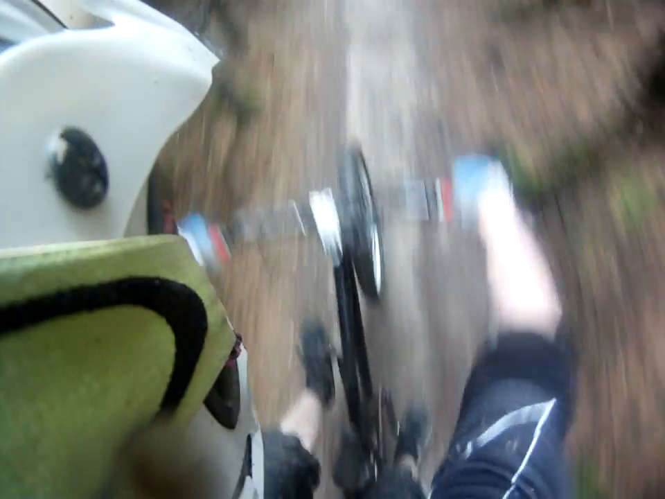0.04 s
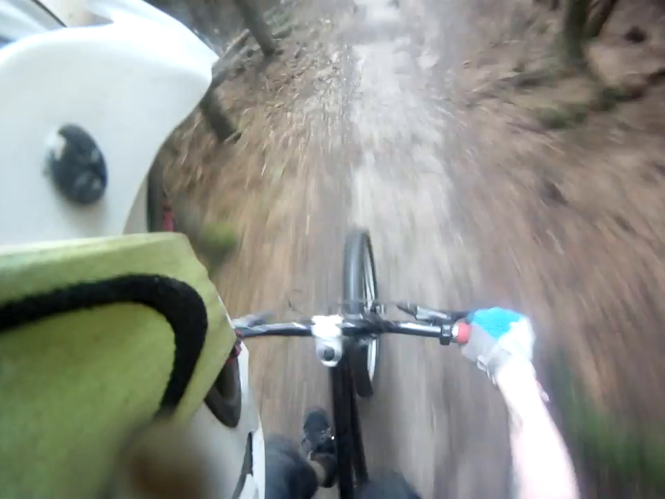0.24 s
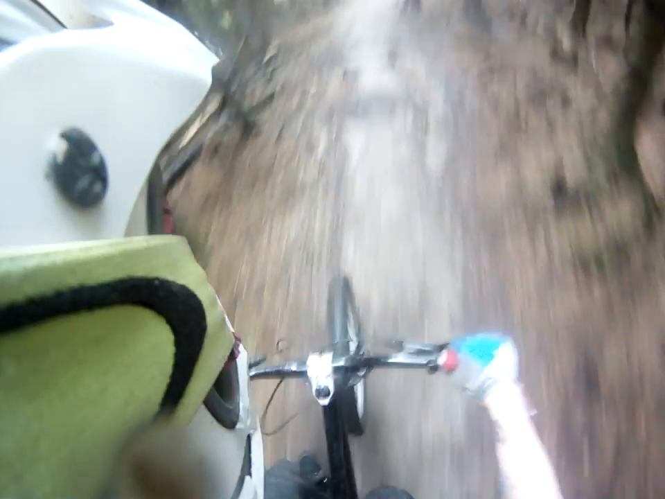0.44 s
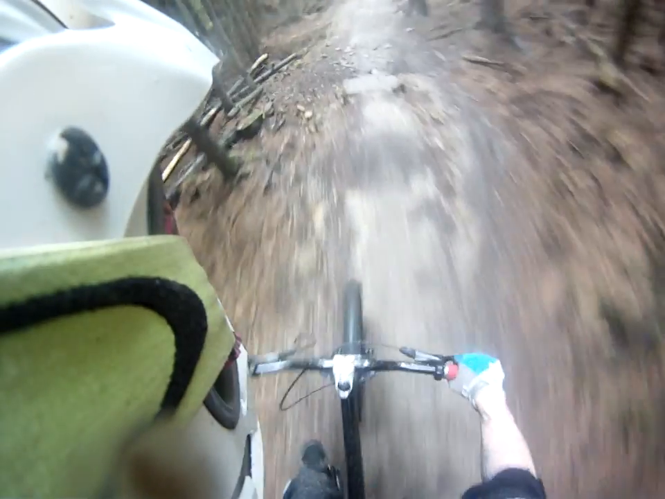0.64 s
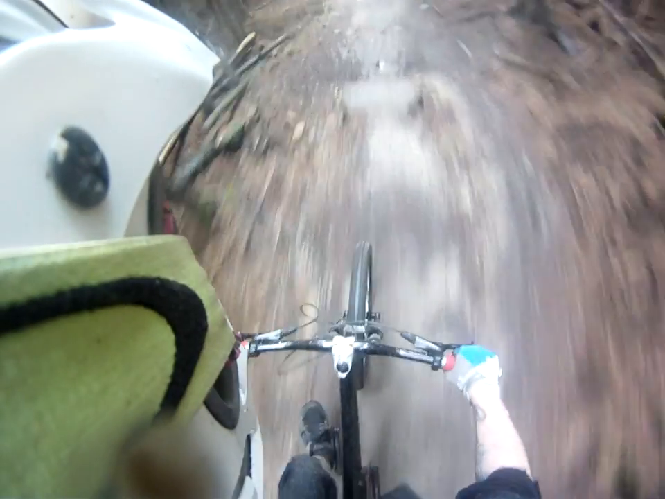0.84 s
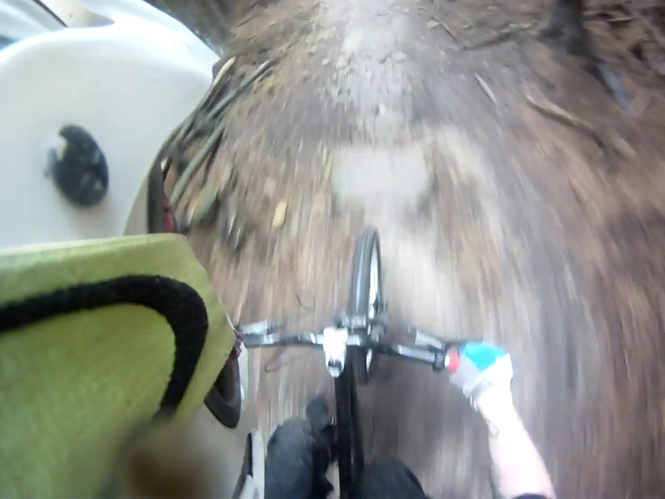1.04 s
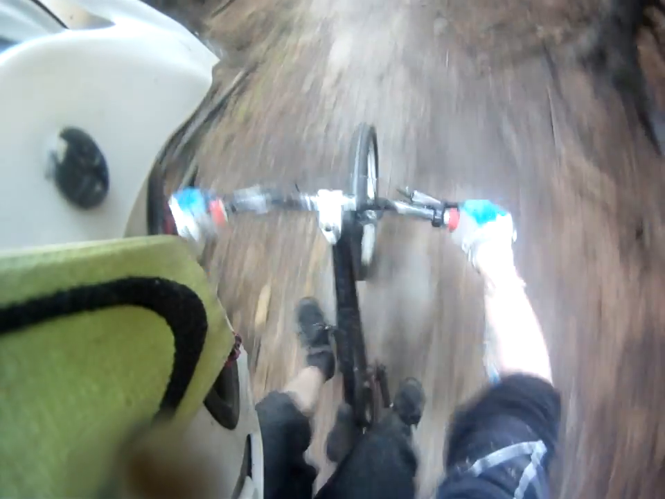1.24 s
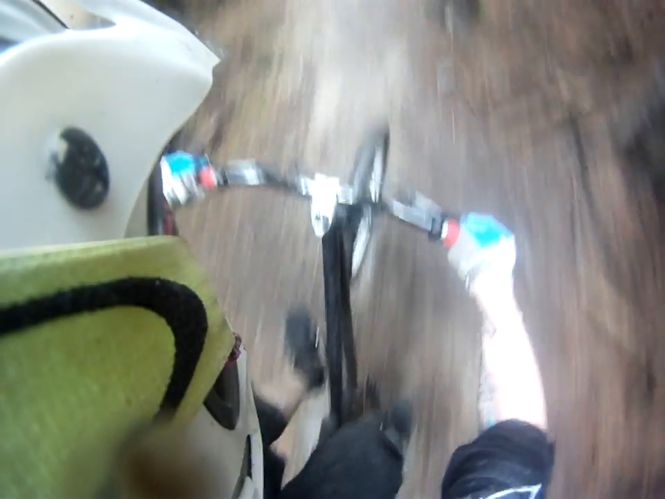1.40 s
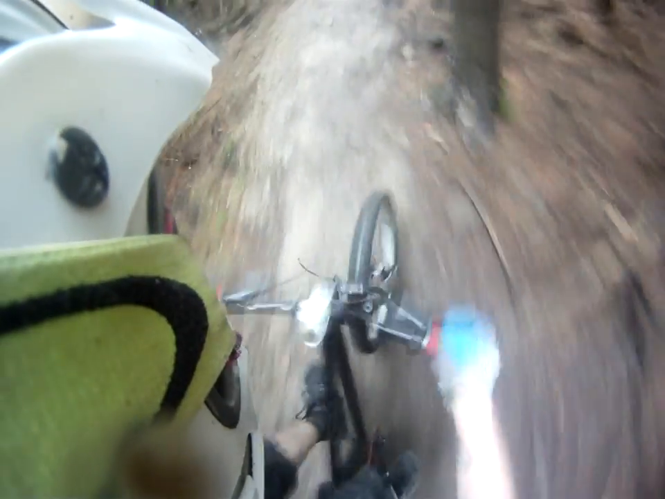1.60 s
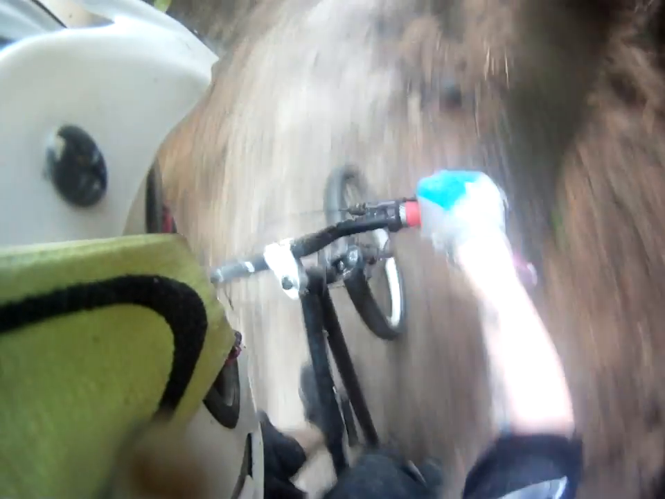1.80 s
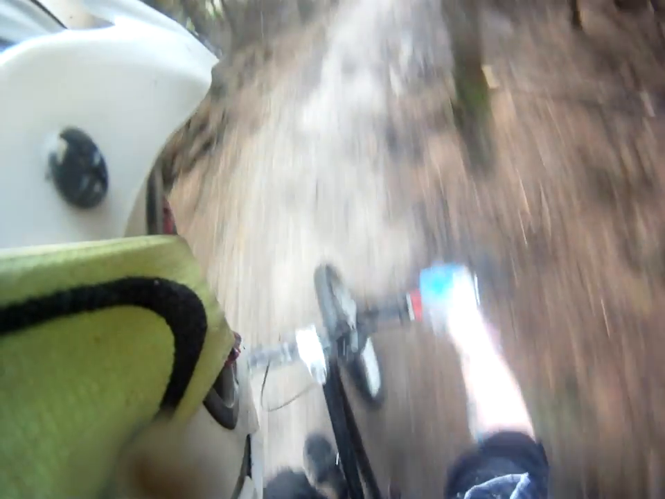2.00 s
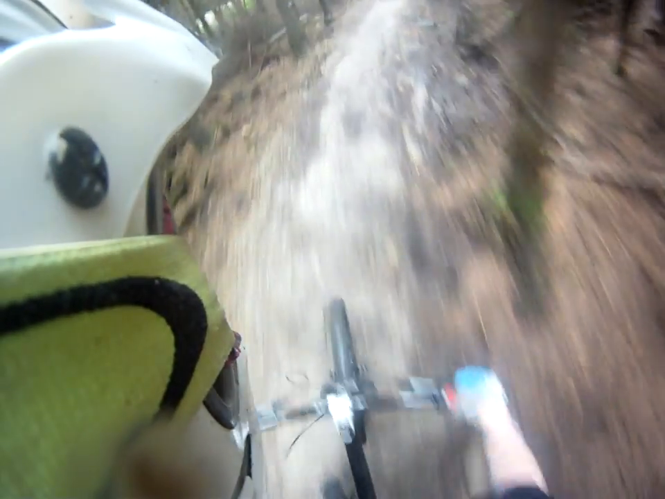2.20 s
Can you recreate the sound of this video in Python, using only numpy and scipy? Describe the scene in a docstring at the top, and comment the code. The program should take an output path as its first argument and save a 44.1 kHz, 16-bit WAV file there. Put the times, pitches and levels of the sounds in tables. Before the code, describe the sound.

A mountain bike knocks over bumps on a dirt trail, with tyre crunch and wind rumble.

```python
"""Mountain bike on a forest trail

On a dirt descent, from a cased camera on the rider's helmet: two microphones, about head height above
the tyres. Wind and ground rumble underneath. Below, tyres crunch over grit and scrub once, stones ping,
the chain jangles and small bumps knock the frame. Right at the microphones, two hard bumps make the
mount clack and the helmet boom. The camera holds coarse samples, mirroring it all into a glassy treble."""
import sys
import numpy as np
from scipy import signal
from scipy.fft import rfft, irfft
from scipy.io import wavfile
from scipy.ndimage import uniform_filter1d

SR = 44100
rng = np.random.default_rng(int(sys.argv[2]) if len(sys.argv) > 2 else 0)


def wav_out(sig):
    """Save sig, one row per channel (or a flat mono array), as 16-bit PCM at SR to the path in sys.argv[1]."""
    wavfile.write(sys.argv[1], SR, np.round(np.clip(np.atleast_2d(sig).T, -1, 1) * 32767).astype(np.int16))


N = 103635
T = np.arange(N) / SR

# rumble of wind and ground, before its ceiling and gain: (time [s], level [dB])
RUMBLE_LEVEL = [(0.0, -49.5), (0.03, -32.5), (0.13, -40), (0.22, -22.5), (0.25, -32), (0.3, -36.5),
                (0.38, -30), (0.42, -24.5), (0.52, -44), (0.69, -41.5), (0.8, -37), (0.84, -45),
                (0.99, -39.5), (1.05, -49), (1.28, -37), (1.33, -27), (1.39, -37), (1.66, -39),
                (1.79, -12.5), (1.83, -29.5), (1.94, -30), (1.98, -43), (2.14, -38), (2.18, -50.5),
                (2.35, -35.5)]
RUMBLE_CEILING_DB, RUMBLE_GAIN_DB = -21.5, 0.5
# that rumble, before a further roll-off: (frequency [Hz], level [dB])
RUMBLE_COLOUR = [(25, 0), (38, 3), (52, -8.5), (70, -16), (88, -15), (115, -39), (170, -40.5), (300, -53.5),
                 (600, -73.5)]
# steady rush of air past the helmet: (frequency [Hz], level [dB])
AIR_COLOUR = [(60, 5.5), (200, 7.5), (350, 2.5), (800, -2.5), (1200, 3), (2000, -25.5), (4500, -13.5)]
# each microphone's own hiss: (frequency [Hz], level [dB])
HISS_COLOUR = [(300, 2.5), (1000, -1), (3000, -6), (4700, 4.5), (5500, -4.5)]
AIR_DB, HISS_DB = -61.5, -75
# air slaps the microphone ports: (time [s], level [dB], t60 [s])
PUFFS = [(0.291, -25, 0.065), (1.777, -39, 0.12)]
# those puffs: (frequency [Hz], level [dB])
PUFF_COLOUR = [(30, -3), (150, 9), (250, -8), (500, -31.5), (1500, -22.5), (5500, -36)]
# the ports crackle on the first hard bump and its rebound: (time [s], level [dB])
CRACKLES = [(0.2865, -24.5), (0.2985, -36.5)]
# those crackles: (frequency [Hz], level [dB])
CRACKLE_COLOUR = [(1000, -6), (2000, 5), (3000, 0), (3800, -3), (5500, -6)]

# a faint ringing scrape, probably a brake disc: (time [s], level [dB])
DISC_LEVEL = [(1.84, -87), (1.93, -61.5), (2.17, -66), (2.3, -87)]
# its resonances: (frequency [Hz], level [dB], t60 [s])
DISC_MODES = [(1450, -0.5, .14), (1486, 0, 0.076), (2736, -10, .12)]
# the chain slaps: (time [s], level [dB])
CHAIN_SLAPS = [(1.6612, -35), (1.694, -48), (1.709, -45), (1.7374, -39)]
# modes of the chain and drive: (frequency [Hz], level [dB], t60 [s])
CHAIN_MODES = [(1216, -7, 0.086), (1552, -8.5, 0.051), (2074, -25, .03), (2732, -6.5, 0.033),
               (3286, -7.5, 0.045), (3890, -14, 0.03)]
JANGLES_PER_S, JANGLE_DB = 86, -11.5   # level relative to the rolling noise
# small stones tick against the bike: (time [s], level [dB], pitch [Hz])
STONES = [(0.668, -46.5, 2800), (0.7525, -49, 2080), (0.8028, -42, 1630), (0.805, -53.5, 3320),
          (0.889, -47, 2650), (0.929, -44, 2130), (0.942, -43, 2380), (1.0038, -44.5, 2360),
          (1.115, -45.5, 1900), (1.807, -42, 2420), (2.071, -51, 2020), (2.082, -44, 2070),
          (2.212, -47.5, 2420), (2.326, -51, 2050)]
# the click in each tick: (frequency [Hz], level [dB])
STONE_CLICK_COLOUR = [(400, -16), (1100, 17), (2200, 32), (3700, -21.5), (5500, -36)]
STONE_CLICK_DB = -9.5   # relative to the ping

# tyres rolling on the trail: (time [s], level [dB])
ROLL_LEVEL = [(0, -65), (0.19, -67), (0.25, -62), (0.35, -61), (0.47, -51), (0.5, -57), (0.58, -63.5),
              (0.78, -56.5), (0.9, -55), (1.01, -59.5), (1.11, -51), (1.2, -56), (1.32, -58.5),
              (1.39, -67.5), (1.64, -70), (1.7, -53), (1.95, -58.5), (2.17, -60.5), (2.35, -62.5)]
# tyres bite into loose grit: (time [s], level [dB], t60 [s])
CRUNCHES = [(0.211, -45.5, 0.16), (0.243, -38, 0.18), (0.437, -66, 0.044), (0.456, -50.5, 0.16),
            (0.922, -52.5, 0.56), (1.658, -40.5, 0.088), (1.698, -47.5, 0.26), (1.734, -48, 0.075),
            (2.073, -49.5, 0.067), (2.173, -49.5, 0.046)]
# grit under the tyres: (frequency [Hz], level [dB])
GRIT_COLOUR = [(300, -9), (800, -10), (1200, -6), (1500, 2), (2100, 4), (2800, -0.5), (3100, -7.5),
               (3600, -3), (4300, -17.5), (5500, -16)]
GRAINS_PER_S, GRAIN_SPREAD_DB, GRAIN_POWER_SHARE = 700, 1.5, 0.6
FLUTTER_HZ, FLUTTER_DB = 60.7, 2.0
# tyres spray fine gravel, then scrub on hard dirt: (time [s], level [dB])
SCRUB_LEVEL = [(0.37, -70), (0.465, -52.5), (0.56, -73), (0.9, -88), (1.01, -61), (1.08, -45.5),
               (1.18, -60.5), (1.25, -49), (1.32, -50), (1.36, -63.5)]
# that spray and scrub: (frequency [Hz], level [dB])
SCRUB_COLOUR = [(1500, -18.5), (2600, 5.5), (3700, 0.5), (4300, -4.5), (5500, 1)]

# dull knocks of the frame: (time [s], thud [dB], rap [dB])
KNOCKS = [(0.004, -58, -56), (0.125, -53, -53.5), (0.186, -36, -51.5), (0.258, -24.5, -38),
          (0.314, -28.5, -44), (0.493, -38, -51), (1.341, -35.5, -46.5), (1.496, -42.5, -54.5),
          (1.698, -29.5, -39.5), (1.76, -26.5, -39.5), (1.773, -23, -32), (2.032, -37.5, -64)]
# low modes of the frame: (frequency [Hz], level [dB], t60 [s])
FRAME_MODES = [(111.5, -1, 0.051), (189.6, 4.5, 0.03), (220.8, 1, 0.054), (301.4, -20.5, 0.025)]
# the rap on top of a knock: (frequency [Hz], level [dB])
RAP_COLOUR = [(150, -14.5), (500, 0.5), (900, 2.5), (1200, 7), (1600, -23), (2100, -5), (3000, -30),
              (6000, -22.5)]
# bumps that shove the helmet: (time [s], shove [dB], shove length [s], boom [dB])
JOLTS = [(0.008, -23, 0.015, -33), (0.2931, -2.5, 0.01, -25), (0.782, -30, 0.019, -67),
         (0.959, -30, 0.019, -56), (1.51, -37, 0.009, -39), (1.776, -9, 0.0163, -14.5),
         (2.064, -37.5, 0.013, -45)]
DIP_DB, DIP_LEAD_S, DIP_LENGTH_S = -9.5, 0.0232, 0.019   # the helmet first sinks the other way
# modes of the helmet on its pads: (frequency [Hz], level [dB], t60 [s])
HELMET_MODES = [(32, -10, 0.62), (87.17, -2.5, 0.37), (219, -27.5, 0.094)]
# hard contacts of the mount, in quick runs: (time [s], level [dB], brightness [dB per octave])
CLACKS = [(0.28376, -12, -6), (0.28618, -7, -2), (0.2878, -7, 0), (0.2883, 5, 1), (0.29009, -9, -1),
          (0.29056, -10, 4), (0.3025, -24, -2), (0.3162, -21, -5), (1.5072, -39, 8), (1.759, -26, -6),
          (1.76888, -14, 1), (1.77052, -12, -5), (1.77165, -16, -6), (1.77228, -2, -6), (1.7754, -20, -6)]
TILT_PIVOT_HZ = 1200
# modes of the plastic case around the microphones: (frequency [Hz], level [dB], t60 [s])
CASE_MODES = [(622, -44, 0.1), (747, -23.5, 0.053), (832, -12, 0.015), (1214, -8, 0.017),
              (1573, -16, 0.028), (1827, -11, 0.013), (1961, -9, 0.019), (2574, -21.5, 0.0096),
              (3643, -21.5, 0.012), (4500, -55, 0.0077)]

CAMERA_RATE_HZ, CAMERA_BAND_HZ, HOLD_STEPS, CUTOFF_HZ = 12000, 5750, 4, 15300


def from_db(db):
    """Decibels to gain."""
    return 10 ** (np.asarray(db) / 20)


def rms_one(x):
    """Scale to unit power."""
    return x / np.sqrt(np.mean(x ** 2) + 1e-20)


def level(rows):
    """Gain over time from (time [s], level [dB]) points."""
    return from_db(np.interp(T, *np.transpose(rows)))


def colour(x, points):
    """Filter a steady signal by (frequency [Hz], level [dB]) points; unit power."""
    hz, db = np.transpose(points)
    bins = np.maximum(np.fft.rfftfreq(N, 1 / SR), 1)
    gains = from_db(np.interp(np.log(bins), np.log(hz), db))
    return rms_one(irfft(rfft(x) * gains, N))


def noise(points):
    """Coloured noise of unit power."""
    return colour(rng.standard_normal(N), points)


def evened(x, size):
    """Take the chance swells out of a noise, over size samples."""
    power = np.abs(signal.hilbert(x)) ** 2 / 2
    return x / np.sqrt(uniform_filter1d(power, size) + 1e-12)


def drift(rate):
    """Random wander of spread 1."""
    return rms_one(np.interp(T * rate, np.arange(1000), rng.standard_normal(1000)))


def burst(start, attack, t60):
    """Envelope: a straight rise, then an exponential fall; times in seconds."""
    age = T - start
    return np.clip(age / attack, 0, 1) * np.exp(-np.log(1000) * np.maximum(age - attack, 0) / t60)


def push(start, length):
    """One smooth bump of height 1."""
    return np.sin(np.pi * np.clip((T - start) / length, 0, 1)) ** 2


def strikes(times, gains):
    """One click for each contact."""
    out = np.zeros(N)
    np.add.at(out, np.clip(np.round(times * SR).astype(int), 0, N - 1), gains)
    return out


def ring(clicks, hz, t60):
    """A unit click sets a sine of height 1 ringing."""
    r, w = np.exp(-np.log(1000) / (t60 * SR)), 2 * np.pi * hz / SR
    return signal.lfilter([0, np.sin(w)], [1, -2 * r * np.cos(w), r * r], clicks + 1e-18)


def resonate(x, modes):
    """A steady excitation through a set of modes; unit power."""
    return rms_one(sum(from_db(db) * rms_one(ring(x, hz, t60)) for hz, db, t60 in modes))


def wind():
    """Wind and ground buffet low down, under a faint steady rush of air past the helmet."""
    buffeting = evened(noise(RUMBLE_COLOUR), size=1400)
    rumble = colour(buffeting, [(200, 2), (500, -35.5)])   # rolls off above 200 Hz
    swell = np.minimum(level(RUMBLE_LEVEL), from_db(RUMBLE_CEILING_DB))
    return from_db(RUMBLE_GAIN_DB) * swell * rumble + from_db(AIR_DB) * noise(AIR_COLOUR)


def microphone_port():
    """What one microphone hears alone: puffs of air on its port, crackles and its own hiss."""
    puff_envelope = sum(from_db(db) * burst(s, attack=0.0034, t60=t60) for s, db, t60 in PUFFS)
    puffs = puff_envelope * evened(noise(PUFF_COLOUR), size=500)
    crackle_envelope = sum(from_db(db) * burst(s, attack=0.0025, t60=0.032) for s, db in CRACKLES)
    crackles = crackle_envelope * noise(CRACKLE_COLOUR)
    return puffs + crackles + from_db(HISS_DB) * noise(HISS_COLOUR)


def disc_rub():
    """Down at the wheel, light rubbing keeps a few narrow resonances singing."""
    return level(DISC_LEVEL) * resonate(rng.standard_normal(N), DISC_MODES)


def chain():
    """Below the rider, the chain jangles as the bike rolls and slaps ahead of the second hard bump."""
    times, slap_db = np.transpose(CHAIN_SLAPS)
    slaps = 0
    for k, (hz, mode_db, t60) in enumerate(CHAIN_MODES):
        scatter_db = rng.normal(0, 1.05, len(times))   # each slap rings the modes differently
        slaps += (-1) ** k * ring(strikes(times, from_db(slap_db + mode_db + scatter_db)), hz, t60)
    touches = rng.standard_normal(N) * (rng.random(N) < JANGLES_PER_S / SR)
    return slaps + from_db(JANGLE_DB) * level(ROLL_LEVEL) * resonate(touches, CHAIN_MODES)


def stones():
    """Each stone flung against the bike gives a short ping with a dry click in it."""
    click = from_db(STONE_CLICK_DB) * noise(STONE_CLICK_COLOUR)
    out = 0
    for s, db, hz in STONES:
        bright_noise = np.gradient(rng.standard_normal(N))
        tick = click + rms_one(ring(bright_noise, hz, t60=0.017))
        even_tick = tick / np.sqrt(uniform_filter1d(tick ** 2, size=120) + 1e-12)
        out += from_db(db) * burst(s, attack=0.00089, t60=0.022) * even_tick
    return out


def grains():
    """Dense snaps of grit of uneven size, over a fine hiss."""
    size_db = GRAIN_SPREAD_DB * np.minimum(rng.exponential(1, N), 4)
    sizes = from_db(size_db) * rng.choice([-1, 1], N)
    snaps = rms_one(sizes * (rng.random(N) < GRAINS_PER_S / SR))
    return np.sqrt(GRAIN_POWER_SHARE) * snaps + np.sqrt(1 - GRAIN_POWER_SHARE) * rng.standard_normal(N)


def tyres():
    """At ground level, tyres roll over grit, crunch into loose patches, spray gravel and scrub."""
    rolling = level(ROLL_LEVEL) * from_db(FLUTTER_DB * drift(FLUTTER_HZ))
    bites = sum(from_db(db) * burst(s, attack=0.0024, t60=t60) for s, db, t60 in CRUNCHES)
    grit = np.hypot(rolling, bites) * colour(grains(), GRIT_COLOUR)
    scrub = level(SCRUB_LEVEL) * colour(grains(), SCRUB_COLOUR)
    return grit + scrub


def frame_knocks():
    """Under the rider, the frame thuds in its low modes, with a short rap on top."""
    times, thud_db, _ = np.transpose(KNOCKS)
    thud = sum((-1) ** k * ring(strikes(times, from_db(thud_db + mode_db)), hz, t60)
               for k, (hz, mode_db, t60) in enumerate(FRAME_MODES))
    rap_envelope = sum(from_db(db) * burst(s, attack=0.0028, t60=0.062) for s, _, db in KNOCKS)
    return thud + rap_envelope * evened(noise(RAP_COLOUR), size=200)


def helmet_jolts():
    """Just under the camera, each bump dips and shoves the helmet, which then booms on its pads."""
    out = 0
    for s, shove_db, length, boom_db in JOLTS:
        shove = push(s, length) - from_db(DIP_DB) * push(s - DIP_LEAD_S, DIP_LENGTH_S)
        boom = sum(from_db(db) * np.sin(2 * np.pi * hz * (T - s - length / 4)) * burst(s, length, t60)
                   for hz, db, t60 in HELMET_MODES)
        out += from_db(shove_db) * shove + from_db(boom_db) * boom
    return out


def mount_clacks():
    """Right at the microphones, the mount chatters against its stop and rings the case."""
    times, contact_db, tilt_db = np.transpose(CLACKS)
    out = 0
    for k, (hz, mode_db, t60) in enumerate(CASE_MODES):
        gains = from_db(contact_db + mode_db + tilt_db * np.log2(hz / TILT_PIVOT_HZ))
        out += (-1) ** k * ring(strikes(times, gains), hz, t60)
    return out


def scene():
    """Inside the case both microphones hear the same ride, each with its own port noise."""
    bumps = mount_clacks() + helmet_jolts() + frame_knocks()
    ride = bumps + tyres() + stones() + chain() + disc_rub() + wind()
    return ride + np.array([microphone_port(), microphone_port()])


def record(dry):
    """The camera thins deep bass, rounds peaks, holds coarse samples and cuts the very top."""
    bass_cut = signal.butter(1, 18, "high", fs=SR, output="sos")
    rounded = np.tanh(signal.sosfilt(bass_cut, dry))
    band_limit = signal.firwin(161, CAMERA_BAND_HZ, fs=SR)
    narrow = signal.fftconvolve(rounded, [band_limit], "same", axes=1)
    coarse = signal.resample_poly(narrow, CAMERA_RATE_HZ, SR, axis=1)
    held = np.repeat(coarse, HOLD_STEPS, axis=1)   # the steps mirror the sound into the treble
    glassy = signal.resample_poly(held, SR, CAMERA_RATE_HZ * HOLD_STEPS, axis=1)[:, :N]
    top_cut = signal.ellip(10, .2, 80, CUTOFF_HZ, fs=SR, output="sos")
    return signal.sosfilt(top_cut, glassy)


dry = scene()
out = record(dry)
wav_out(out)
```